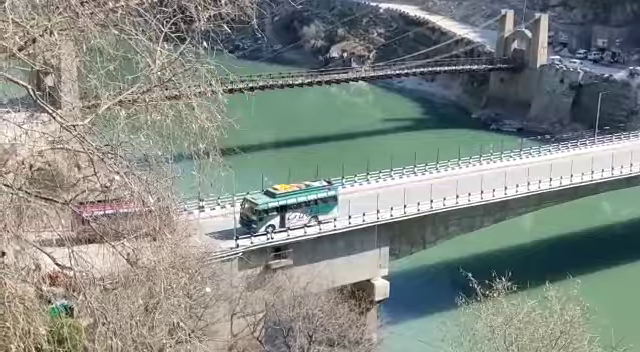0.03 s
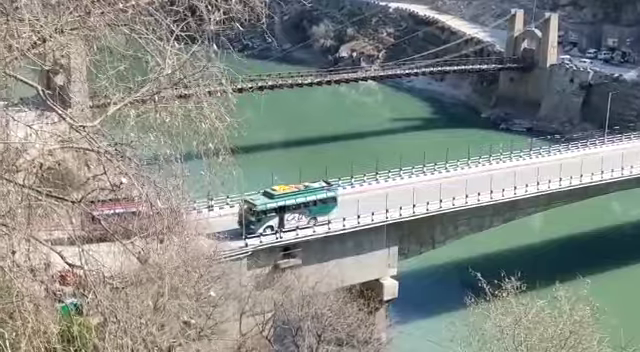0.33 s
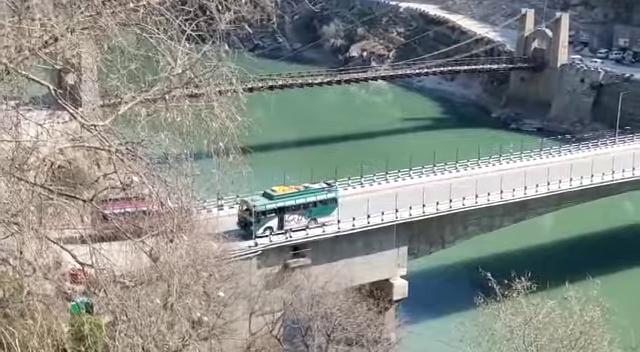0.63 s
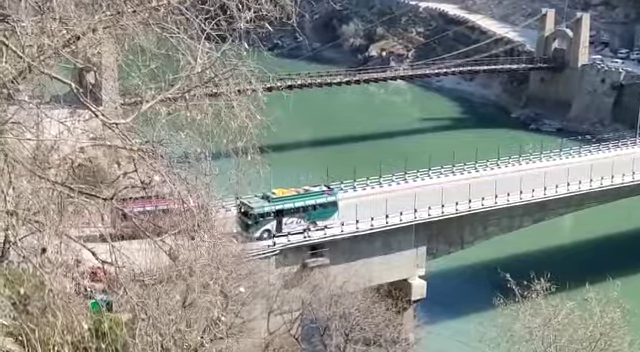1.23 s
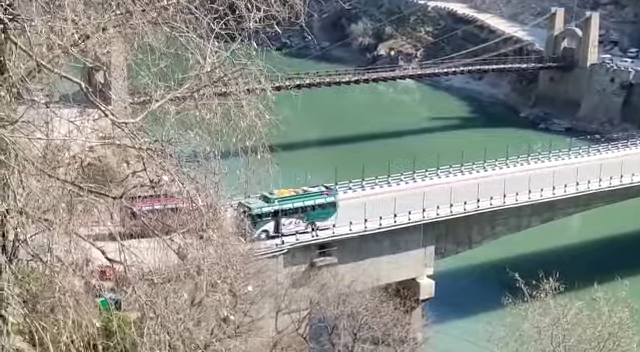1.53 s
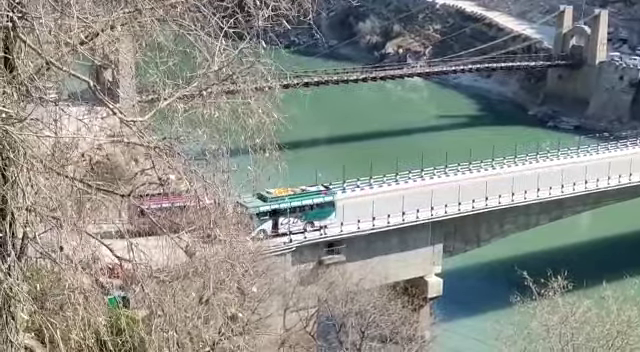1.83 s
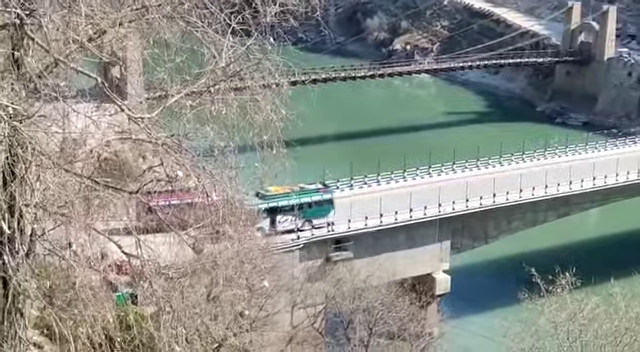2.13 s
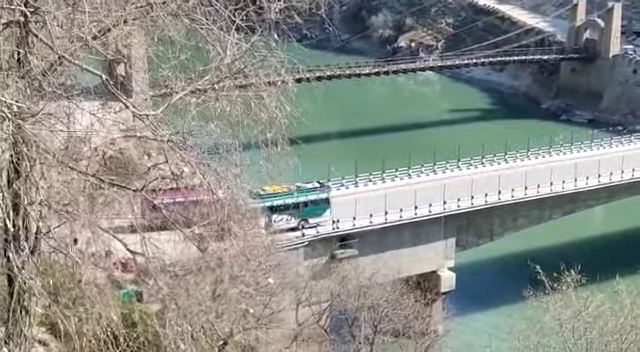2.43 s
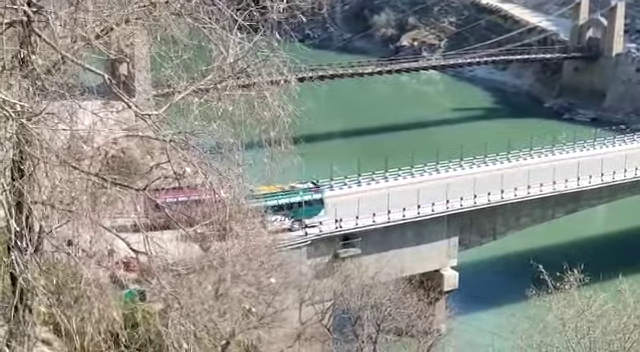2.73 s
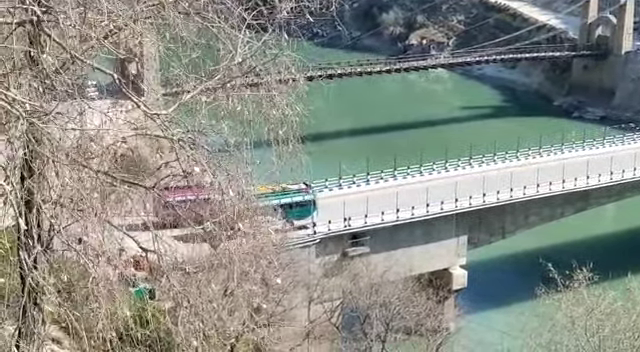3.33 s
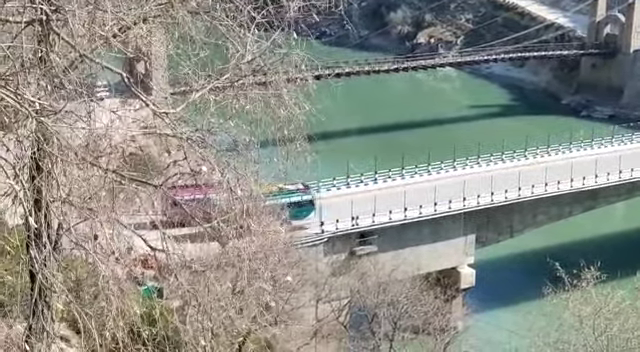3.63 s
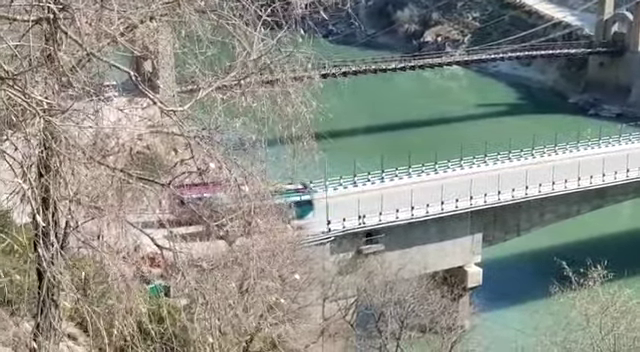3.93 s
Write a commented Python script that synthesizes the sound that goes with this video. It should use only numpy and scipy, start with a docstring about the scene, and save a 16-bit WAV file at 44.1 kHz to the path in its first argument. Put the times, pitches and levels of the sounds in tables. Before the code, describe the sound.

Wind rumbles on the microphone outdoors, over the steady rush of a distant river. Far traffic roars dully at first and dies down, while short low puffs bump the microphone and the river hisses on.

```python
"""A hillside above a river and a road bridge, heard through two small microphone ports.
At first far traffic roars over the river's steady rush, twigs swish, and wind rumbles on the left port.
The tyre hiss fades within a second, and eddies begin to strike the ports in short puffs.
Midway the river's bright hiss swells in the breeze, the twigs brush again, and some of the longer puffs
flutter raggedly on the right port. The traffic dies down, leaving river and wind to the end."""
import sys
import numpy as np
from scipy import signal
from scipy.fft import rfft, irfft
from scipy.io import wavfile
from scipy.ndimage import uniform_filter1d

SR = 44100
rng = np.random.default_rng(int(sys.argv[2]) if len(sys.argv) > 2 else 0)


def pcm_store(signal):
    """Save signal as 16-bit PCM."""
    levels = np.round(np.clip(np.atleast_2d(signal), -1, 1) * 32767)
    wavfile.write(sys.argv[1], SR, levels.astype(np.int16).T)


N = 176400


def amp(db):
    """Amplitude ratio: tenfold for every 20 dB."""
    return 10 ** (np.asarray(db) / 20)


def unit_rms(x):
    """Normalisation to a mean power of one."""
    return x / np.sqrt(np.mean(x ** 2) + 1e-20)


def spectrum(table, hz, column=1):
    """Interpolation of a table column on a log-frequency axis."""
    table = np.array(table, float)
    return np.interp(np.log(hz + 1), np.log(table[:, 0] + 1), table[:, column])


def curve(table, t, column=1):
    """Linear interpolation of a table column over time."""
    table = np.array(table, float)
    return np.interp(t, table[:, 0], table[:, column])


def wander(rate_hz):
    """Slow random modulation: noise of unit rms, low-passed at rate_hz."""
    hz = np.fft.rfftfreq(N, 1 / SR)
    return unit_rms(irfft(rfft(rng.standard_normal(N)) / (1 + (hz / rate_hz) ** 4), N))


def band(centre_hz, width_hz):
    """Band-pass noise of unit rms with a bell-shaped spectrum."""
    hz = np.fft.rfftfreq(N, 1 / SR)
    bell = 1 / (1 + ((hz - centre_hz) / width_hz) ** 2) ** 2
    return unit_rms(irfft(rfft(rng.standard_normal(N)) * bell, N))


def correlate(a, b, correlation):
    """Partial coherence: two independent noises mix into two related channels."""
    return np.array([a, correlation * a + np.sqrt(1 - correlation ** 2) * b])


def traffic():
    """Far tyres and engines sum to a dull, fading roar, coherent between the ports in the bass."""
    # Each row: frequency in Hz, relative spectral level in dB.
    colour = [(25, -72), (80, -52), (125, -79), (185, -56), (270, -66.5), (430, -61.5), (700, -70),
              (1100, -73.5), (1700, -77.5), (3000, -114)]
    # Each row: time in seconds, gain in dB.
    fade = [(0, 2), (.55, 2.5), (.8, -3), (2.3, -8), (2.7, -14.5), (4, -13.5)]
    # Each row: frequency in Hz, correlation between the ports.
    coherence = [(300, 0.91), (1000, 0.03)]
    hz = np.fft.rfftfreq(N, 1 / SR)
    a, b = rfft(rng.standard_normal((2, N)))
    noise = correlate(a, b, spectrum(coherence, hz))
    roar = irfft(noise * amp(spectrum(colour, hz)), N) * np.sqrt(SR / 2)
    sides_db = np.array([[1.5], [-1.5]])
    return roar * amp(curve(fade, np.arange(N) / SR) + sides_db)


def tyres(start_db=-41.5, fade_s=0.4):
    """Rolling noise of the nearest vehicle: a hiss that fades as it draws away."""
    fade = np.exp(-(np.arange(N) / SR / fade_s) ** 2)
    return amp(start_db) * fade * np.array([band(centre_hz=1500, width_hz=1800) for port in range(2)])


def river(gain_db=-0.54, patchy_db=2.73, left_lag_s=0.0005, left_swell=1.18):
    """Broadband water noise, placed on the right by its later arrival at the left port."""
    # Each row: frequency in Hz, relative spectral level in dB on the left, then on the right.
    rush = [(60, -62, -63), (180, -60, -61), (350, -69, -71), (600, -77, -78), (1400, -78.5, -78.5),
            (2300, -73.5, -77), (2900, -74.5, -79.5), (3400, -78, -82), (4500, -83, -82.5),
            (5000, -79.5, -82.5), (5650, -72.5, -83), (6450, -77.5, -78), (7100, -74.2, -70.5),
            (7650, -73.7, -68.7), (8300, -74, -74), (9120, -74.5, -78.5), (9600, -86.5, -89),
            (10600, -95, -97), (12200, -103, -104), (15000, -107.5, -107.5)]
    # Each row: time in seconds, midrange swell in dB, treble swell in dB (scaled up on the left).
    swells = [(0, 3, 1.3), (0.38, 1, 1), (0.85, 1, -1.5), (1.12, 1.5, 0.1), (1.43, 5.5, 0.7),
              (1.8, 0.8, 0.9), (1.97, 2, 3.2), (2.27, 1.5, 2.5), (2.6, 0.1, -0.5), (2.92, 1.1, 0.3),
              (3.3, 0.3, 0.2), (4, -0.8, -0.2)]
    # Each row: frequency in Hz, correlation between the ports apart from the lag.
    coherence = [(60, 1), (400, 0.2), (1500, 0.29), (4000, 0.55), (5700, 0.31), (6550, 1), (7300, 0.11),
                 (8100, 0.85), (10000, 0.17)]
    hz, t, noise = signal.stft(rng.standard_normal((2, N)), SR, nperseg=1024, noverlap=768)
    noise = correlate(noise[0], noise[1], spectrum(coherence, hz)[:, None])
    noise[0] *= np.exp(-2j * np.pi * hz * left_lag_s)[:, None]
    treble = spectrum([(3800, 0.12), (6000, 0.99)], hz)[:, None]
    mid = spectrum([(500, 0), (1800, 1)], hz)[:, None] * (1 - treble)
    mid_db, treble_db = mid * curve(swells, t), treble * curve(swells, t, column=2)
    swell_db = np.array([mid_db + left_swell * treble_db, mid_db + treble_db])
    # The hiss flickers in patches, 7 frequency bins by 8 frames.
    patches = uniform_filter1d(rng.standard_normal(noise.shape[1:]), size=7, axis=0)
    patches = unit_rms(uniform_filter1d(patches, size=8, axis=1))
    colour_db = np.array([spectrum(rush, hz), spectrum(rush, hz, column=2)])[:, :, None]
    noise *= amp(gain_db + colour_db + swell_db + (treble + mid / 2) * patchy_db * patches)
    return np.sqrt(SR / 2) * signal.istft(noise, SR, nperseg=1024, noverlap=768)[1][:, :N]


def twigs():
    """Friction noise: dry twigs nearby brush faintly in the breeze."""
    # Each row: frequency in Hz, relative spectral level in dB.
    colour = [(1200, -93), (3300, -70), (6000, -85), (8600, -61.5), (10300, -81), (15000, -96)]
    # Each row: peak time in seconds, half length in seconds, gain in dB.
    swishes = [(0.134, 0.019, -5), (1.42, 0.22, -14)]
    hz, t = np.fft.rfftfreq(N, 1 / SR), np.arange(N) / SR
    hiss = irfft(rfft(rng.standard_normal((2, N))) * amp(spectrum(colour, hz)), N) * np.sqrt(SR / 2)
    return hiss * sum(amp(db) * np.exp(-((t - peak) / half) ** 2) for peak, half, db in swishes)


def wind_rumble(windward_db=-1.14, lee_db=-15.5, lumpy_db=3.0, lump_hz=18):
    """Turbulent pressure fluctuates at each port, strongly on the windward left, weakly in the lee."""
    # Each row: time in seconds, relative wind level in dB.
    breeze = [(0, -28), (0.65, -34.5), (0.8, -21), (1.02, -17.5), (1.25, -25.5), (1.45, -20.5),
              (1.72, -30.5), (1.95, -18.5), (2.12, -23), (2.35, -24.5), (2.57, -27.5), (2.72, -21.5),
              (2.95, -27), (3.06, -19), (3.35, -22), (3.62, -20), (4, -20)]
    # Each row: frequency in Hz, relative spectral level in dB.
    colour = [(8, -47), (25, 7.5), (50, -2), (80, 0.5), (115, -6), (170, -0.5), (240, -5.5), (330, -11),
              (450, -19), (650, -34.5), (1000, -34.5), (2500, -93)]
    hz = np.fft.rfftfreq(N, 1 / SR)
    level = amp(curve(breeze, np.arange(N) / SR))
    ports = []
    for port_db in (windward_db, lee_db):
        turbulence = rng.standard_normal(N) * amp(lumpy_db * wander(lump_hz))
        rumble = unit_rms(irfft(rfft(turbulence) * amp(spectrum(colour, hz)), N))
        ports.append(amp(port_db) * level * rumble)
    return np.array(ports)


def wind_puffs(port_db=(0, -1), edge_order=2.69, kick_s=0.013, size=16384):
    """An eddy striking a port is a pressure kick in low noise whose level and pitch follow the flow."""
    # Each row: peak time and length in seconds, relative level in dB, nominal upper edge in Hz,
    # port (0 left, 1 right).
    eddies = [(0.54, 0.011, -20, 564, 0), (0.738, 0.04, -20.5, 220, 1), (0.836, 0.016, -17.5, 310, 1),
              (0.975, 0.05, -20, 168, 0), (1.063, 0.0069, -12, 342, 0), (1.303, 0.06, -16, 313, 1),
              (1.365, 0.018, -16, 199, 0), (1.424, 0.05, -17, 300, 1), (1.512, 0.035, -17, 372, 1),
              (1.661, 0.039, -19, 211, 1), (1.759, 0.046, -17, 317, 1), (1.829, 0.054, -19, 360, 1),
              (1.994, 0.018, -14.5, 277, 1), (2.052, 0.01, -12, 312, 1), (2.067, 0.01, -11.5, 316, 1),
              (2.109, 0.0099, -16.5, 353, 1), (2.135, 0.0077, -10.5, 374, 1), (2.216, 0.04, -18, 230, 0),
              (2.254, 0.039, -14, 296, 1), (2.284, 0.01, -14, 240, 1), (2.364, 0.023, -17.5, 296, 1),
              (2.476, 0.034, -19.5, 297, 1), (2.702, 0.021, -19.5, 240, 0), (2.995, 0.02, -13, 312, 1),
              (3.199, 0.0093, -17.5, 214, 0), (3.265, 0.009, -18.5, 237, 0), (3.552, 0.011, -16.5, 266, 0),
              (3.622, 0.03, -12.5, 170, 0), (3.623, 0.012, -12, 506, 1), (3.665, 0.04, -17, 372, 1),
              (3.886, 0.024, -17.5, 183, 0)]
    # Each row: frequency in Hz, relative gain in dB on the left, then on the right.
    colour = [(10, 8, -12), (35, 0.5, -0.5), (80, 3, -3.5), (124, -6.5, -6), (166, 2.5, 5.5), (275, 5.5, 1),
              (617, -0.5, 1.5), (990, -2, -11.5)]
    out = np.zeros((2, N + size))
    t, hz = (np.arange(size) - size // 2) / SR, np.fft.rfftfreq(size, 1 / SR)
    for peak, length, db, edge_hz, port in eddies:
        width_s = length * np.where(t < 0, 0.5, 0.64)  # the flow rises faster than it falls
        flow = 1 / (1 + np.abs(t / width_s) ** 2.6)
        low_pass = 1 / np.sqrt(1 + (hz / edge_hz) ** (2 * edge_order))
        noise = irfft(rfft(rng.standard_normal(size)) * low_pass, size)
        position = np.cumsum(flow ** 0.45)  # faster flow, higher pitch
        swirl = unit_rms(flow * np.interp(position, np.arange(size), noise))
        kick_hz = 0.67 * edge_hz
        phase = 2 * np.pi * kick_hz * t
        kick = unit_rms(-phase * np.exp(-phase ** 2 / 2))
        kick_share = 0.45 * min(1, kick_s / length) ** 2  # of the energy; less in long eddies
        pressure = np.sqrt(1 - kick_share) * swirl + np.sqrt(kick_share) * kick
        burst = unit_rms(irfft(rfft(pressure) * amp(spectrum(colour, hz, column=1 + port)), size))
        start = round(peak * SR) - size // 2
        out[port, start:start + size] += amp(db + port_db[port]) * burst * np.sqrt(np.mean(flow ** 2))
    return out[:, :N]


def wind_flutter(ragged_db=3, ragged_hz=70):
    """Amplitude-modulated band noise: some of the longer puffs flutter raggedly on the right port."""
    # Each row: peak time in seconds, length in seconds, peak rms level in dB.
    flutters = [(1.509, .035, -34), (1.819, 0.02, -33.5), (2.262, 0.038, -34.5), (2.36, 0.021, -35),
                (2.468, .02, -35)]
    t = np.arange(N) / SR
    level = sum(amp(db) * np.exp(-2 * ((t - peak) / length) ** 2) for peak, length, db in flutters)
    flutter = unit_rms(band(centre_hz=806, width_hz=490) * amp(ragged_db * wander(ragged_hz)))
    return np.array([np.zeros(N), level * flutter])


def scene():
    """Superposition of far river and traffic, nearby twigs and wind on the microphone."""
    return river() + traffic() + tyres() + twigs() + wind_rumble() + wind_puffs() + wind_flutter()


def record(dry):
    """Band limiting: a linear-phase low-pass removes the highest treble."""
    edge_hz = 15700
    low_pass = signal.firwin(511, edge_hz, window=("kaiser", 9), fs=SR)
    return signal.oaconvolve(dry, low_pass[None], "same")


dry = scene()
out = record(dry)
pcm_store(out)
```